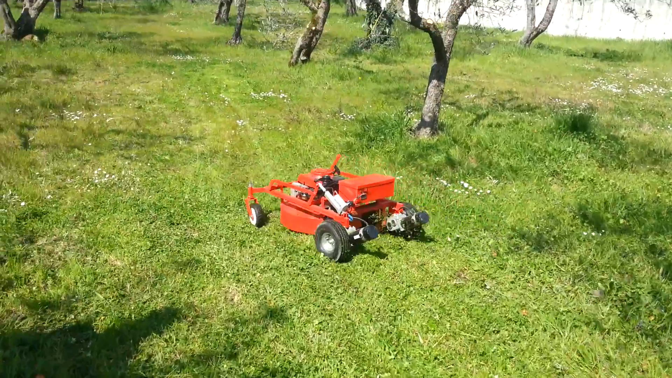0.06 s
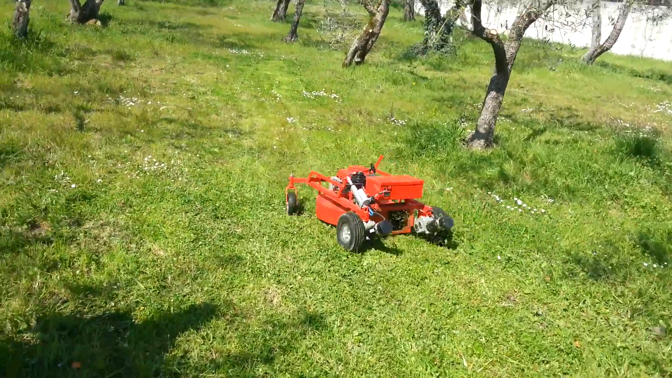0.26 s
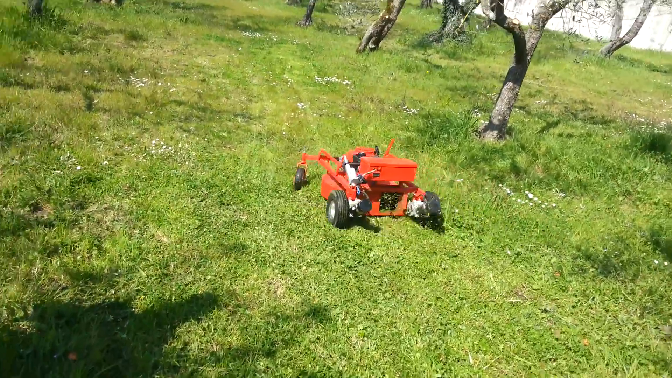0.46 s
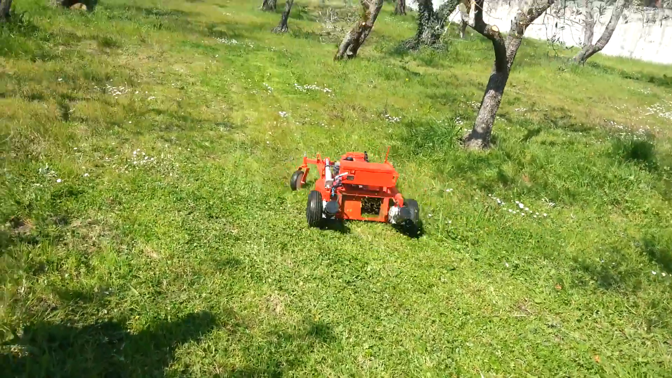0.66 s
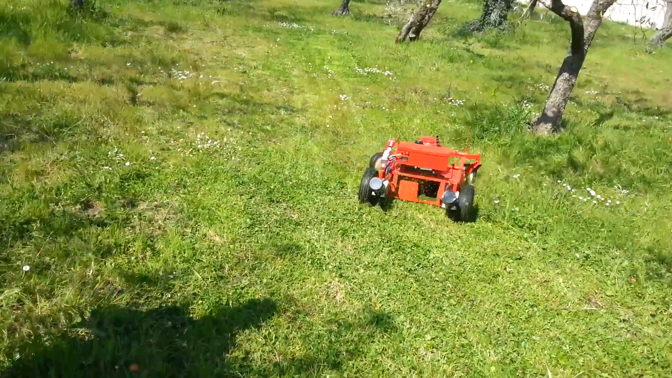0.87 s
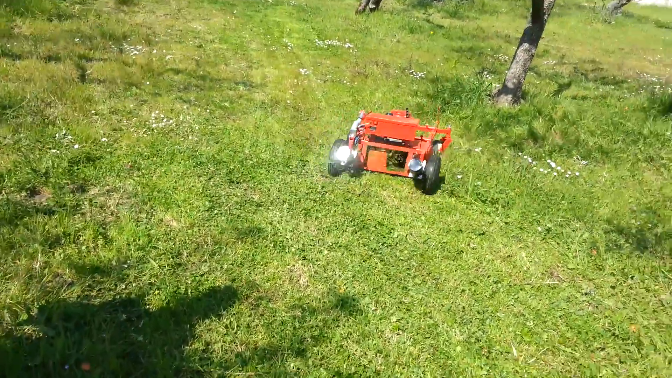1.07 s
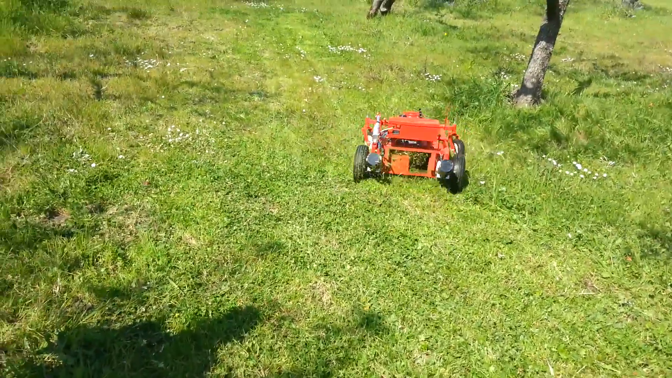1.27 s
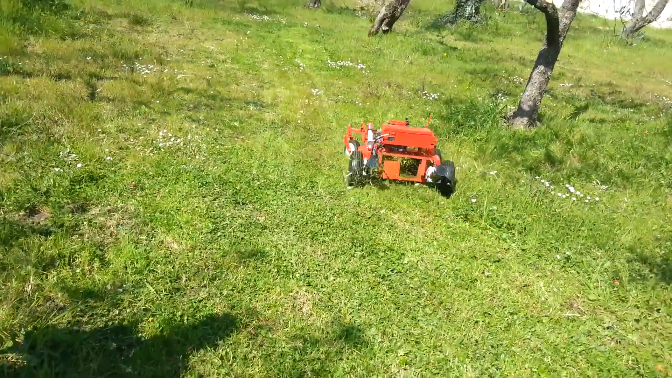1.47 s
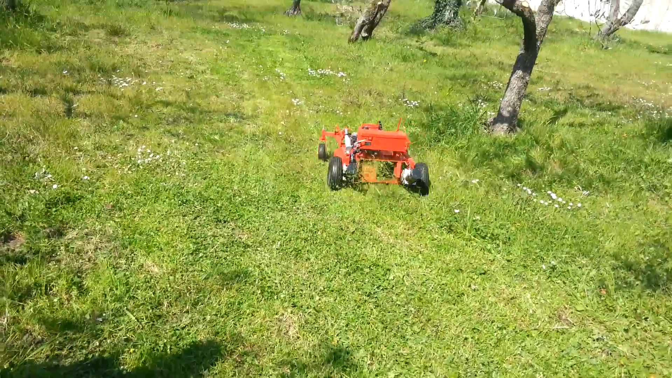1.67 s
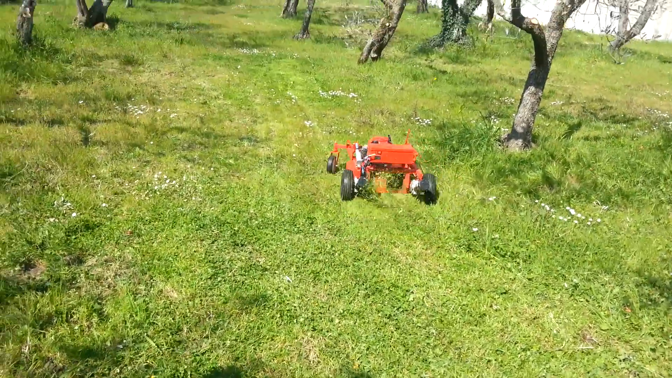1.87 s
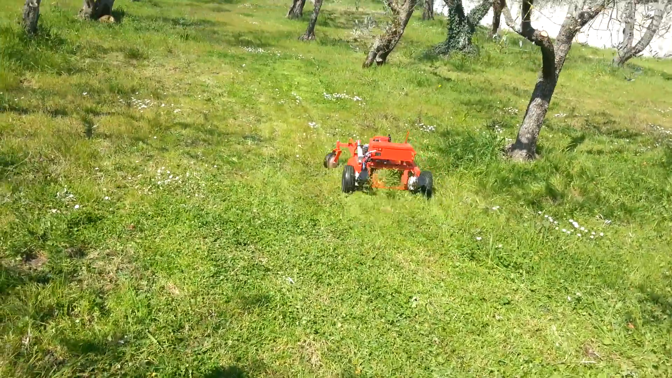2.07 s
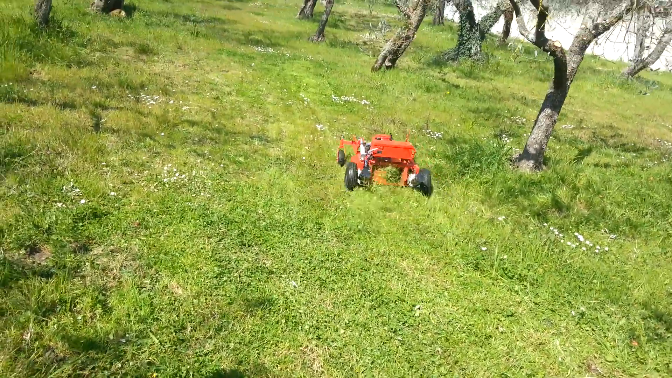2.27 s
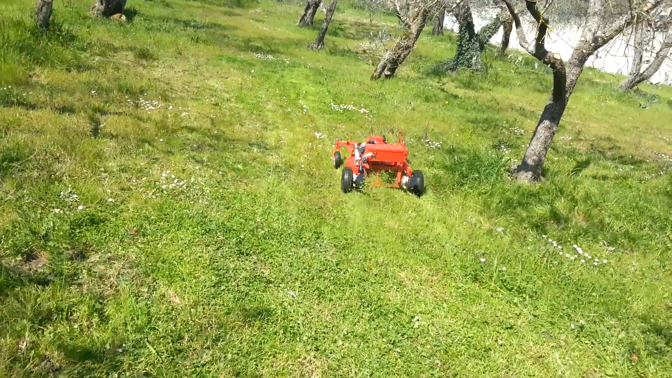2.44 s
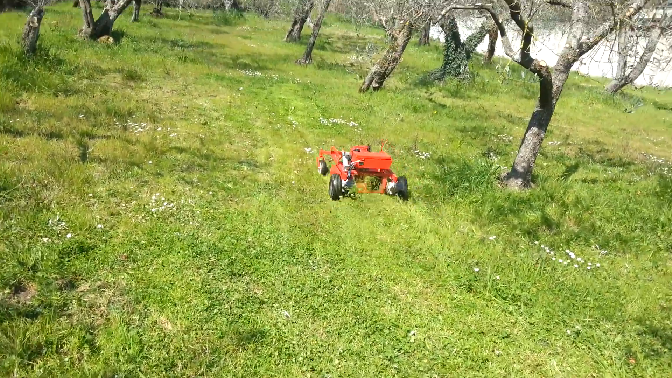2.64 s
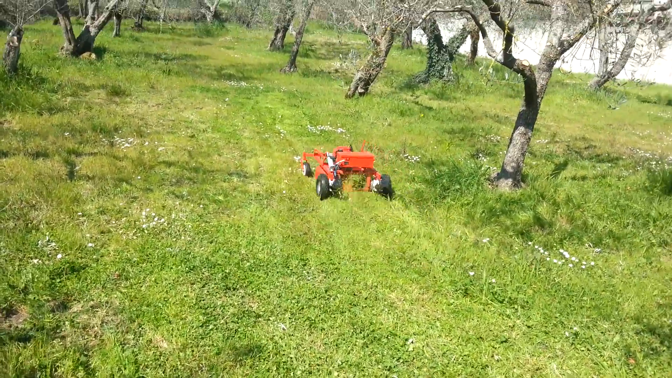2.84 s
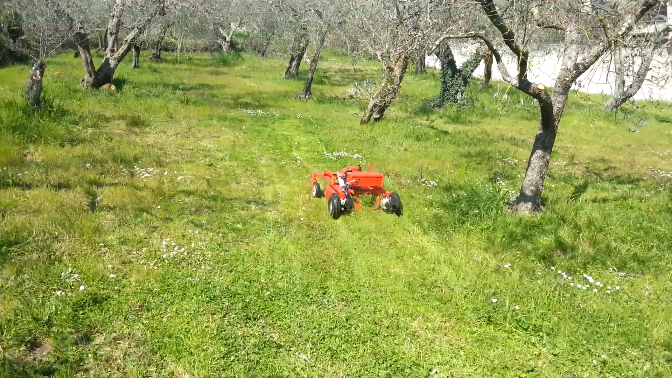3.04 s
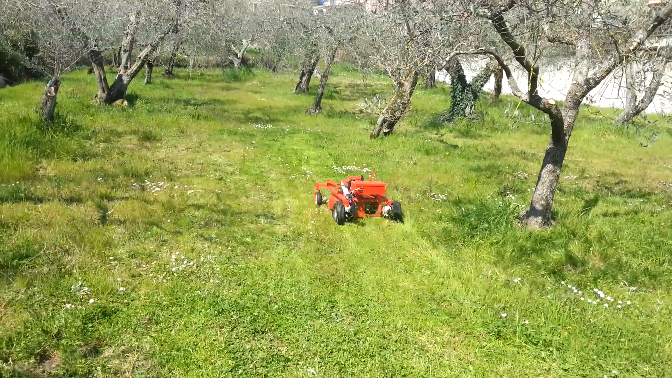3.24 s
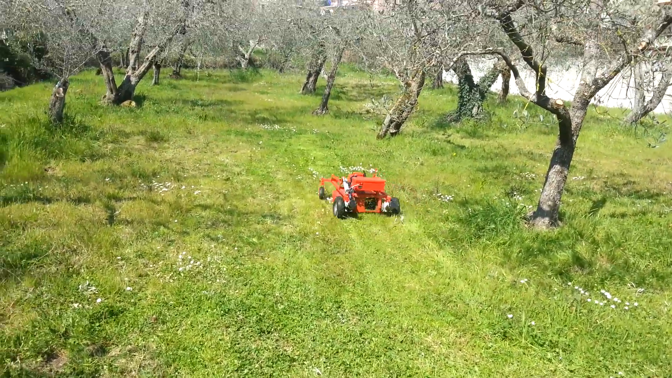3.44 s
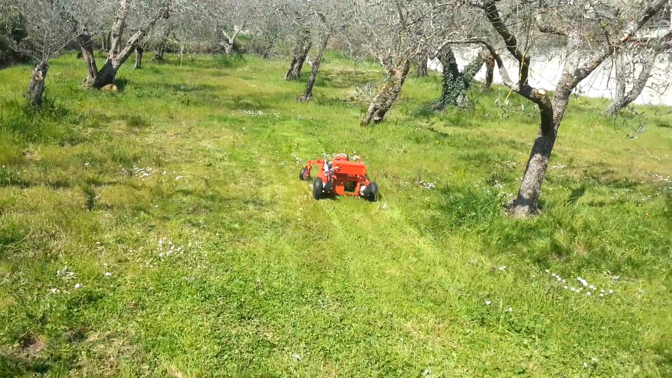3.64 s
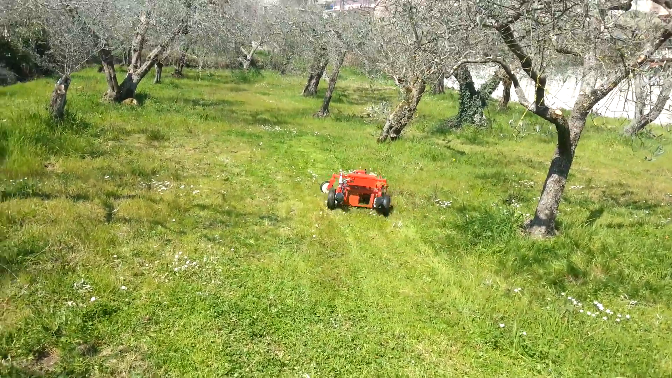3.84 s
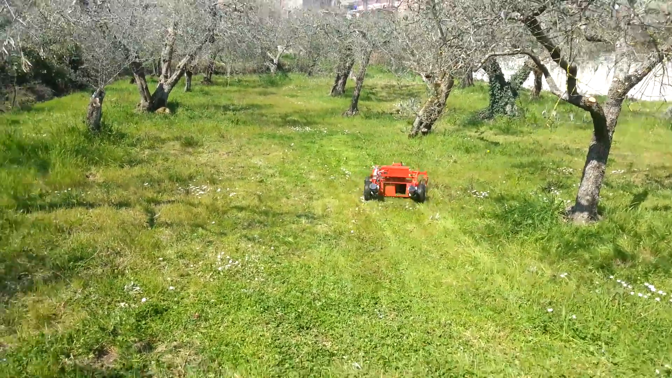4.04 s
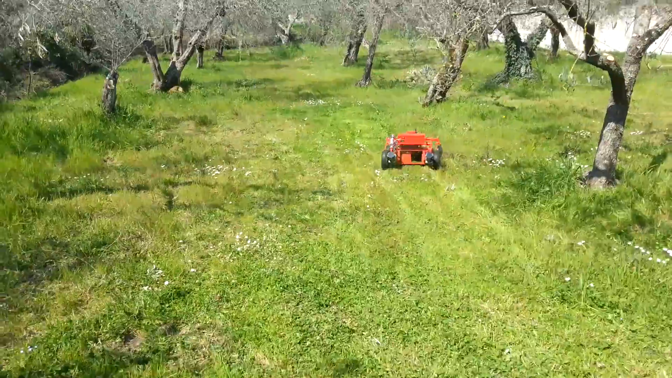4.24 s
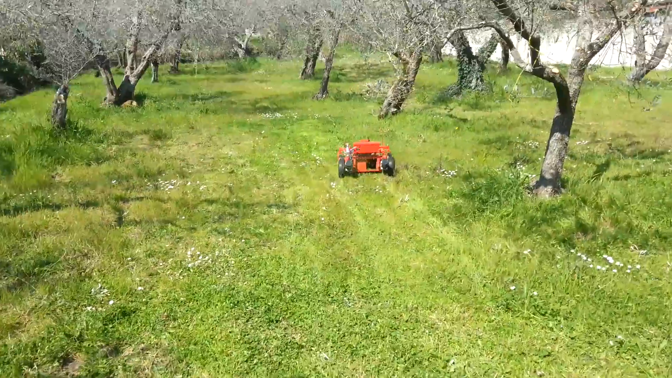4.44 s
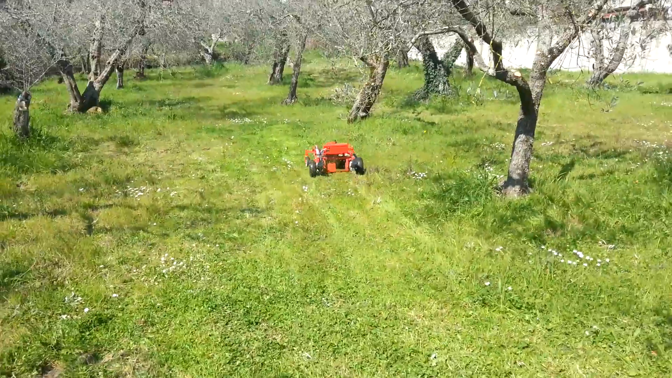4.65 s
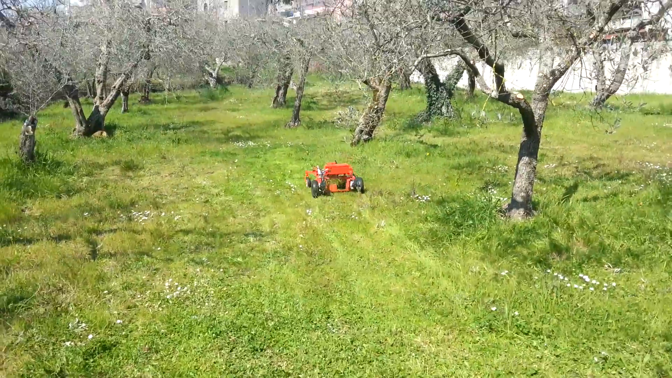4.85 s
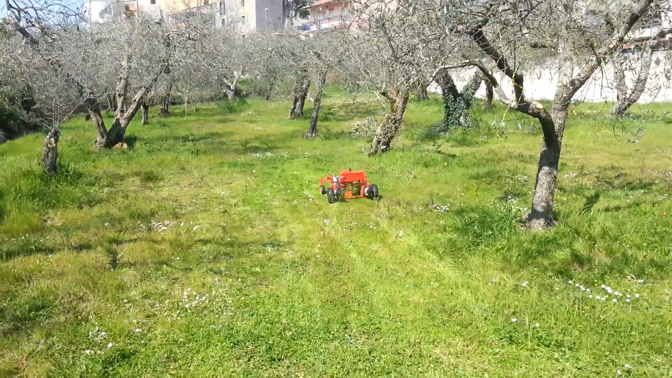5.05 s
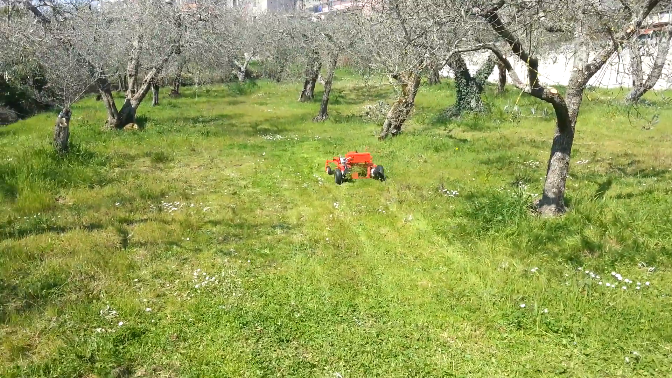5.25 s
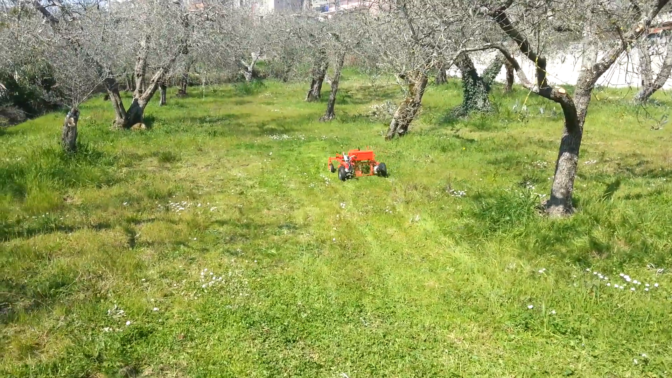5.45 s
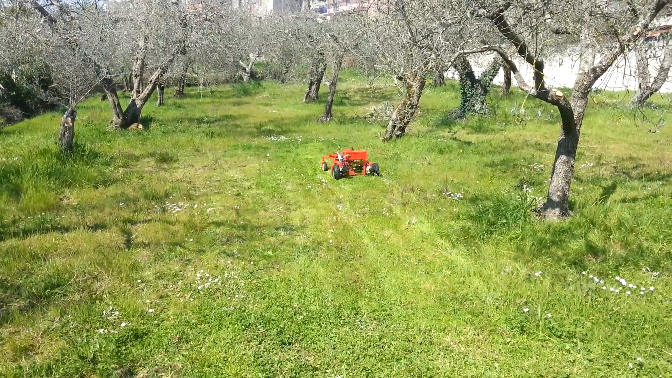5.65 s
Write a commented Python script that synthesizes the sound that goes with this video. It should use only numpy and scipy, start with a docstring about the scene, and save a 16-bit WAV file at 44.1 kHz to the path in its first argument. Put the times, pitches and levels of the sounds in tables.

```python
"""A single-cylinder four-stroke engine throbs in a remote-controlled mower that recedes through long grass,
then sounds somewhat nearer. Exhaust pulses ring the muffler; knocks clatter in block, deck and panels.
The blade buzzes as summed lines; noise and random snaps make shredded grass, flung stalks, passing bands.
Wheel motors whine at fixed pitch. Ground bounce and a short scattered tail surround the mower.
The right microphone port is shaded at first and opens up after about four seconds."""
import sys
import numpy as np
from scipy import signal
from scipy.fft import rfft, irfft, next_fast_len
from scipy.io import wavfile
from scipy.ndimage import uniform_filter1d

SR = 44100
rng = np.random.default_rng(int(sys.argv[2]) if len(sys.argv) > 2 else 0)


def to_wav(s):
    """Save 16-bit WAV."""
    ch = np.atleast_2d(s).T  # columns
    pcm = np.round(np.clip(ch, -1, 1) * 32767)  # PCM
    wavfile.write(sys.argv[1], SR, pcm.astype(np.int16))


N = 251799
TIME = np.arange(N) / SR

# Engine speed. Each row: time in seconds, crankshaft speed in turns per minute.
CRANK_SPEED = [(0.0, 2347), (0.4, 2340), (0.8, 2357), (1.2, 2363), (1.65, 2317), (2.0, 2313), (2.4, 2314),
               (2.95, 2308), (3.4, 2354), (4.0, 2361), (4.4, 2380), (4.8, 2367), (5.15, 2328), (5.71, 2332)]
# Blows within one two-turn cycle. Each row: place as share of the cycle, relative gas pulse in dB,
# relative clatter in dB.
CYCLE_BLOWS = [(.132, 1.5, -5), (.349, 4, -5.5), (0.47, -10.5, -9.5), (.705, 1, -6.5), (0.912, -8, -7)]
# Slow rises and falls in loudness of the deck and exhaust.
# Each row: time in seconds, deck gain in dB, exhaust gain in dB.
LOUDNESS_SWINGS = [(0, 1.5, 1), (.35, -1, -1.5), (.65, 1, 0), (.8, -6, -0.5), (1.02, 1, 1),
                   (1.27, -0.5, -3), (1.52, 1.5, 3.5), (1.75, -1, 0.5), (2.25, -1, 2), (2.7, 1, 0.5),
                   (2.8, -0.5, 0), (3.5, 0, -1.5), (4.28, -2.5, -1), (4.38, 1.5, -1.5), (4.85, -0.5, -2.5),
                   (5.12, 3.5, -1), (5.5, -3, -1.5), (5.71, -3, -2)]


def gain_of(db):
    """Decibels to amplitude."""
    return 10 ** (np.asarray(db) / 20)


def evened(x):
    """Scales to an rms of one."""
    return x / np.sqrt(np.mean(x ** 2) + 1e-20)


def curves(rows):
    """One value per sample for each column of a time table."""
    s, *columns = np.transpose(rows)
    return [np.interp(TIME, s, column) for column in columns]


def read(points, hz):
    """Interpolates a spectrum table on a log-frequency axis."""
    f, value = np.transpose(points)
    return np.interp(np.log(hz + 1), np.log(f + 1), value)


def filtered(x, response):
    """Applies a response given as a function of frequency in Hz."""
    size = next_fast_len(N + 8192)
    spectrum = rfft(x, size) * response(np.fft.rfftfreq(size, 1 / SR))
    return irfft(spectrum, size)[..., :N]


def coloured(x, points):
    """Filters x by a spectrum table and scales it to an rms of one."""
    return evened(filtered(x, lambda hz: gain_of(read(points, hz))))


def wander(rate_hz, channels=1):
    """Slow random motion of rms one, low-passed near rate_hz."""
    noise = rng.standard_normal((channels, N))
    return evened(filtered(noise, lambda hz: 1 / (1 + (hz / rate_hz) ** 4)))


def spread(pair):
    """Two unrelated signals become left and right, their likeness set band by band."""
    # Stereo likeness. Each row: frequency in Hz, left-right correlation.
    likeness = [(30, 0.21), (70, 0.7), (120, 0.83), (300, 0.92), (700, 0.99), (1300, 0.72), (2700, 0.8),
                (3600, 0.25), (5000, 0.15), (8000, 0.65), (14000, 0)]

    def same(hz):
        return np.clip(read(likeness, hz), -1, 1)

    mid = filtered(pair[0], lambda hz: np.sqrt((1 + same(hz)) / 2))
    side = filtered(pair[1], lambda hz: np.sqrt((1 - same(hz)) / 2))
    return np.array([mid + side, mid - side])


def distant(near_db, fall_db):
    """Level in dB of a mower part: near_db at 4 m, falling fall_db per doubling of distance."""
    # The mower recedes, then sounds somewhat nearer at the end.
    # Each row: time in seconds, distance in metres.
    distance = [(0, 3.75), (.6, 4), (.8, 4.6), (1.3, 5.75), (2.3, 7.7), (3.0, 8.53), (3.9, 9.8),
                (4.45, 10.4), (4.85, 13.3), (5.71, 9.8)]
    near_m = 4
    return near_db - fall_db * np.log2(curves(distance)[0] / near_m)


def orchard(x, wet_db=-12, t60_s=0.86, taps_per_s=2500, change_hz=2.515, count=3):
    """Trunks and a wall scatter a short, thin tail whose paths keep changing as the mower moves."""
    t = TIME[:SR // 4]
    shape = (count, 2, len(t))
    taps = rng.standard_normal(shape) * (rng.random(shape) < taps_per_s / SR)
    tails = taps * gain_of(-60 * t / t60_s) * (t > .004)
    tails /= np.linalg.norm(tails, axis=2, keepdims=True)
    wet = 0
    for k, tail in enumerate(tails):
        window = np.sqrt(2 / count) * np.cos(np.pi * (change_hz * TIME + k / count))
        wet = wet + signal.oaconvolve(x * window, tail, axes=1)[:, :N]
    return x + gain_of(wet_db) * wet


def ground(x):
    """Sums direct sound and lawn bounce; the comb notches slide as the paths change."""
    # Bounce off the ground. Each row: time in seconds, delay in ms, strength from 0 to 1.
    bounce_path = [(0, 1.18, 0.19), (.4, 1.19, 0.23), (.8, 1.14, .3), (1.0, 1.12, 0.36), (1.2, 1.23, 0.33),
                   (1.55, 1.17, 0.28), (1.9, 1.25, 0.29), (2.2, 1.24, 0.3), (2.68, 1.34, 0.28),
                   (2.88, 1.42, 0.36), (3.5, 1.46, 0.17), (4.05, 1.44, 0.22), (4.4, 1.26, .1),
                   (5.05, 1.22, 0.18), (5.71, 1.32, 0.22)]
    delay_ms, strength = curves(bounce_path)
    soft = filtered(x, lambda hz: 1 / (1 + (hz / 5500) ** 4))  # grass swallows the treble
    bounce = np.array([np.interp(TIME - delay_ms / 1000, TIME, channel) for channel in soft])
    return (x + strength * bounce) / np.sqrt(1 + strength ** 2)


def turning(x):
    """Crossfades from side to rear radiation, which differ in colour."""
    # Colour heard from the side. Each row: frequency in Hz, gain in dB.
    flank = [(200, 0), (275, 0.5), (312, 1.9), (360, -1.5), (420, -7.5), (560, 1.5), (780, -4.5),
             (1080, 1.5), (1300, 2), (1540, -5), (1760, 1), (2300, 0), (2850, -1.5), (3400, 0), (5500, -3),
             (9000, -2)]
    # The mower turns its back. Each row: time in seconds, share side-on.
    heading = [(0, 0.78), (.6, 0.84), (1.15, 0.9), (1.6, 0.29), (2.0, 0.036), (5.71, 0)]
    side_on = filtered(x, lambda hz: gain_of(read(flank, hz)))
    return x + np.clip(curves(heading)[0], 0, 1) * (side_on - x)


def mowing():
    """Extra cutting noise and engine load in dB: each tuft is bitten, held and cleared."""
    # The blade runs into thick tufts. Each row: start in seconds, length in seconds,
    # rise of cutting noise in dB, engine load in dB.
    thick_tufts = [(0.08, 0.05, 2.5, -2), (0.31, 0.051, 0.5, 3), (0.46, 0.27, 1, 1), (0.804, 0.018, 3.5, 1),
                   (0.874, 0.046, 6.5, 4), (0.947, .13, 4, 4), (1.23, 0.012, 10, -2.5),
                   (1.336, 0.068, 4, 1.5), (1.487, .04, 2.5, 6), (1.549, 0.037, 7, 3.5),
                   (1.626, 0.027, 3, 3.5), (1.72, 0.063, 2.5, 5), (1.822, 0.034, 6, 4.5),
                   (1.948, 0.074, 3, 1.5), (2.14, 0.1, 4, 3), (2.408, 0.084, 3, 4),
                   (2.607, 0.078, 4.5, 2.5), (2.68, 0.16, 2.5, -4), (3.775, 0.049, 1.5, -2),
                   (4.155, 0.058, 2.5, -2.5), (4.514, 0.02, 6.5, 1), (4.982, 0.034, 6, 2.5),
                   (5.016, 0.085, 4.5, 4), (5.084, 0.051, 5.5, 4.5), (5.15, 0.066, 2.5, 2.5),
                   (5.29, 0.12, 2, 2.5), (5.348, .025, 4, 1.5), (5.503, 0.022, 2.5, 1.5),
                   (5.678, .03, 6, 4.5)]
    bite_s, clear_s = 0.017, 0.031
    cut, load = np.zeros(N), np.zeros(N)
    for start, length, cut_db, load_db in thick_tufts:
        since = TIME - start
        shape = np.clip(since / bite_s, 0, 1) * np.exp(-np.clip(since - length, 0, 1) / clear_s)
        cut = np.maximum(cut, cut_db * shape)
        load = np.maximum(load, load_db * shape)
    return cut, load


def motors(load, rasp_db=5, rasp_hz=55, per_load=1.0):
    """The wheel motors whine at a fixed switching pitch; their gears fray each line into a rasp."""
    # Whine lines. Each row: multiple of motor_hz (rounded), relative level in dB.
    whine_lines = [(3, -4.5), (4, -1.5), (6, -11)]
    # Rise and fall of the whine. Each row: time in seconds, gain in dB before load.
    drive = [(0, -31), (1.5, -60), (1.9, -40), (2.4, -42), (2.7, -45), (2.82, -44), (4.2, -47), (5.1, -49),
             (5.71, -57)]
    motor_hz = 390.5
    whine = 0
    for order, db in whine_lines:
        a, b = gain_of(rasp_db) * wander(rasp_hz, channels=2)
        angle = 2 * np.pi * round(order) * motor_hz * TIME
        whine = whine + gain_of(db) * ((1 + a) * np.cos(angle) + b * np.sin(angle))
    return gain_of(curves(drive)[0] + per_load * load) * whine


def snaps(decay_s=0.0073, low_hz=5500):
    """Each dry stem snaps on the blade with a short bright tick of high-passed noise."""
    # Snapping stems. Each row: time in seconds, level in dB.
    stem_ticks = [(0.0423, -22), (0.0982, -30), (0.1346, -20), (0.157, -21), (0.167, -24), (0.5232, -25),
                  (0.9717, -19), (1.3977, -24), (1.5833, -20), (1.6606, -33), (2.6728, -35), (4.176, -28),
                  (4.191, -33), (4.387, -31), (4.6004, -39), (5.0175, -26), (5.0674, -22), (5.5238, -40),
                  (5.6226, -26), (5.6875, -27)]
    hits = np.zeros(N)
    for s, db in stem_ticks:
        hits[round(s * SR)] = gain_of(db)
    noise = rng.standard_normal((2, N))
    crack = evened(filtered(noise, lambda hz: hz ** 2 / (hz ** 2 + low_hz ** 2)))
    return crack * signal.lfilter([1], [1, -np.exp(-1 / (decay_s * SR))], hits)


def shred(cycles, snaps_per_s, snap_db, size_db, chop, tuft_db, tufts_per_s, tuft_s):
    """Both blade tips sweep through the grass each turn: a hiss with many small snapping stems."""
    rank = np.minimum(rng.exponential(1, (2, N)), 3.5)
    sizes = gain_of(size_db * rank) * (rng.random((2, N)) < snaps_per_s / SR)
    stems = evened(sizes * rng.choice([-1, 1], (2, N)))
    sweep = 1 + chop * np.cos(2 * np.pi * 2 * 2 * (cycles - .08))  # two tips, two turns a cycle
    bites = rng.uniform(0.34, 2.5, N) * (rng.random(N) < tufts_per_s / SR)
    tufts = signal.lfilter([1], [1, -np.exp(-1 / (tuft_s * SR))], bites)  # bitten at once, then clears
    hiss = rng.standard_normal((2, N)) + gain_of(snap_db) * stems
    return hiss * sweep * np.sqrt(1 + gain_of(tuft_db) ** 2 * tufts)


def crackle_bands(cycles, swell=.5):
    """Bands of crackling noise swell and fade, pulsing at the blade-tip rate."""
    # Passing crackling noise bands, from low deck booms to thin high grass hiss.
    # Each row: start in seconds, length in seconds, centre in Hz, width in Hz, level in dB.
    bands = [(0, 0.29, 1690, 160, -27.5), (0, 0.19, 1050, 220, -28), (0.523, 0.17, 590, 150, -28.5),
             (0.613, 0.29, 2010, 260, -31), (0.945, 0.096, 636, 240, -24), (1.231, 0.033, 2460, 450, -18),
             (1.327, 0.12, 3200, 1200, -28.5), (1.336, .09, 567, 110, -28.5),
             (1.548, 0.043, 2700, 350, -27), (1.7, 1.0, 1670, 150, -40), (1.79, 0.075, 340, 60, -30),
             (1.95, 0.79, 2280, 300, -34), (2.6, 0.15, 4200, 2200, -37), (4.302, 0.18, 2690, 1150, -32.5),
             (4.58, .5, 13600, 1800, -37), (5.07, 0.09, 1600, 1500, -34), (5.094, 0.066, 4540, 1200, -33),
             (5.342, 0.045, 4600, 1900, -28.5)]
    crackle = shred(cycles, snaps_per_s=1200, snap_db=-0.5, size_db=3.0, chop=0.34,
                    tuft_db=2.5, tufts_per_s=62, tuft_s=0.011)
    out = np.zeros((2, N))
    for start, length, centre, width, db in bands:
        def band(hz):
            return np.minimum(hz / centre, 1) / (1 + (2 * (hz - centre) / width) ** 2)

        arch = abs(np.sin(np.pi * np.clip((TIME - start) / length, 0, 1))) ** swell
        out += gain_of(db) * arch * evened(filtered(crackle, band))
    return out


def stalks(knock_db=-5, hardness=0.72, scatter_db=-19, scatter_s=0.0074):
    """A stalk hits the deck and its pieces scatter; ringing grows faster with strength than scatter."""
    # Stalks flung against the deck. Each row: time in seconds, relative strength in dB.
    flung = [(0.1343, 0), (0.8874, -20), (0.976, -10), (1.2526, -4), (1.283, -3.5), (1.358, -7),
             (1.5439, 0.5), (1.558, -6), (1.5702, -4), (1.584, -2), (1.7418, -6), (1.8415, -5.5),
             (2.145, -8), (2.4254, -4), (4.9917, -9), (5.032, -6.5), (5.092, -4), (5.12, -8), (5.36, -6)]
    # Hard knock on the deck. Each row: mode in Hz, relative level in dB, t60 in seconds.
    knock_modes = [(1760, -6, 0.018), (2500, -9, 0.018), (3370, -8, 0.015), (4400, -18, 0.013),
                   (5670, -12, 0.0065), (7840, -6, 0.0049)]
    # Scattered pieces. Each row: frequency in Hz, relative level in dB per Hz.
    scatter_colour = [(30, -50), (200, -22), (900, -39), (1700, -25), (2500, 25), (3400, -17), (4200, -7),
                      (8000, 12), (14500, 7)]
    t = TIME[:SR // 10]
    ring = 0
    for k, (hz, db, t60_s) in enumerate(knock_modes):
        ring = ring + (-1) ** k * gain_of(db - 60 * t / t60_s) * np.sin(2 * np.pi * hz * t)
    hits = np.zeros(N)
    for s, db in flung:
        hits[round(s * SR)] = gain_of(db)
    knocks = signal.oaconvolve(hits ** (1 + hardness), ring)[:N]
    envelope = signal.oaconvolve(hits, np.exp(-t / scatter_s))[:N]
    scatter = envelope * coloured(rng.standard_normal((2, N)), scatter_colour)
    return gain_of(knock_db) * knocks + gain_of(scatter_db) * spread(scatter)


def grass(cycles, cut, tear_db=2, fizz_db=-2.5, heavy_db=-33, fizz_growth=0.37):
    """A coarse tearing, and a fine fizz that grows faster with the cutting level."""
    # Sward between the tufts. Each row: time in seconds, thickness as dB of cutting noise.
    sward = [(0, 2), (.55, -1.5), (.78, -5), (1.15, 0.5), (2.0, 1), (2.9, 0), (3.3, -4), (3.85, -2.5),
             (4.0, -3.5), (4.4, -4), (4.75, 7), (5.25, 7), (5.71, 4)]
    # Torn grass. Each row: frequency in Hz, relative level in dB per Hz.
    tear_colour = [(300, -27), (1500, 0), (3200, -0.5), (3520, 2), (3700, 3), (4000, 2.5), (4400, -2.5),
                   (5200, -4), (6500, -6), (8000, -6.5), (14500, -27.5)]
    # Fine fizz. Each row: frequency in Hz, relative level in dB per Hz.
    fizz_colour = [(2500, -16), (5000, 4), (7500, 0), (9500, 4), (12000, 5), (14500, -1)]
    level = distant(near_db=-30, fall_db=6) + curves(sward)[0] + cut
    coarse = shred(cycles, snaps_per_s=1400, snap_db=-2.5, size_db=3.5, chop=0.2,
                   tuft_db=2.5, tufts_per_s=45, tuft_s=0.0097)
    fine = shred(cycles, snaps_per_s=700, snap_db=-2.5, size_db=5.0, chop=0.058,
                 tuft_db=-1.0, tufts_per_s=91, tuft_s=0.0079)
    tear = gain_of(tear_db) * coloured(coarse, tear_colour)
    fizz = gain_of(fizz_db + fizz_growth * (level - heavy_db)) * coloured(fine, fizz_colour)
    return gain_of(level) * (tear + fizz)


def blade(cycles, load, waver_db=2.0, per_load=0.68, count=38):
    """Two tips pass the chute every turn: a buzz whose lines waver in the churning air."""
    # Tip-passing buzz. Each row: frequency in Hz, relative level in dB per line.
    buzz_colour = [(160, -14), (310, -0.5), (390, -6), (470, 2.5), (545, -1.5), (625, -3), (700, 0),
                   (860, -5), (1020, -3.5), (1250, -3), (1650, -10.5), (1900, -6.5), (2300, -6.5),
                   (3000, -9)]
    passes = 2 * 2 * cycles  # two tips, two turns a cycle
    pass_hz = 2 * np.mean(curves(CRANK_SPEED)[0]) / 60
    wavers = gain_of(waver_db * wander(12.4, channels=5))
    buzz = 0
    for k in range(2, count):
        line = np.cos(2 * np.pi * (k * passes + rng.random()))
        buzz = buzz + gain_of(read(buzz_colour, k * pass_hz)) * wavers[k % len(wavers)] * line
    return gain_of(distant(near_db=-30.5, fall_db=6.5) + per_load * load) * evened(buzz)


def panels(cycles, load, low_hz=520, high_hz=2800, t60_s=0.071, uneven_db=3, per_load=0.53):
    """Every engine blow sets some loose panel ringing briefly, at a random pitch each time."""
    t, out = TIME[:SR // 12], np.zeros((2, N))
    for place, _, db in CYCLE_BLOWS:
        starts = np.flatnonzero(np.diff(np.floor(cycles - place)) > 0)
        for at, (pitch, size, *phases) in zip(starts, rng.random((len(starts), 4))):
            hz = low_hz + (high_hz - low_hz) * pitch
            decay = gain_of(db + uneven_db * (2 * size - 1) - 60 * t / t60_s)
            ring = decay * np.sin(2 * np.pi * (hz * t + np.c_[phases]))
            out[:, at:at + len(t)] += ring[:, :N - at]
    level = distant(near_db=-30, fall_db=6) + curves(LOUDNESS_SWINGS)[0] + per_load * load
    return gain_of(level) * evened(out)


def blows(cycles, levels_db, decay, uneven_db):
    """Amplitude of each cycle's blows: sharp rise, decay in cycles, random spread of uneven_db."""
    power = 0
    for (place, _, _), db in zip(CYCLE_BLOWS, levels_db):
        since = cycles - place + 1
        chance = rng.standard_normal(256)[since.astype(int)]
        pulse = gain_of(db + uneven_db * chance) * np.exp(-(since % 1) / decay)
        power = power + pulse ** 2
    return evened(np.sqrt(power))


def rattle(cycles, repeat, steady, decay, uneven_db, size=2048):
    """Valve and piston knocks, their fine pattern partly repeating each cycle, over a steady rush of air."""
    pattern = rng.standard_normal((2, size))[:, (cycles % 1 * size).astype(int)]
    share = np.clip(repeat, 0, 1)
    grain = np.sqrt(share) * pattern + np.sqrt(1 - share) * rng.standard_normal((2, N))
    knocks = grain * blows(cycles, np.transpose(CYCLE_BLOWS)[2], decay, uneven_db)
    return knocks + steady * rng.standard_normal((2, N))


def deck_response(hz):
    """The steel deck's resonances, summed in power; it radiates little below them."""
    # Deck resonances. Each row: centre in Hz, width parameter in Hz, relative peak in dB.
    resonances = [(1584, 107, 8), (2070, 1200, -8), (2290, 900, 6.5), (2590, 220, -10.5), (3300, 1200, -7),
                  (4550, 160, -1), (5620, 25, -16), (5680, 27, 1), (6120, 50, -11), (7240, 150, -12.5)]
    power = 0
    for f, width, db in resonances:
        power = power + gain_of(db) ** 2 / (1 + (2 * (hz - f) / width) ** 2) ** 1.51
    return np.sqrt(power)


def machine(cycles, cut, load, deck_per_load=0.18, deck_per_cut=0.47):
    """Knocks sound through engine block and deck, harder under load; cut grass drums the deck too."""
    # Engine block. Each row: frequency in Hz, relative level in dB per Hz.
    block_colour = [(100, -47), (300, 4), (440, 0.5), (600, 2.5), (720, 2.5), (850, -2.5), (1080, -1),
                    (1270, -6), (1450, -5.5), (1800, -8), (3000, -11.5), (8000, -33)]
    block_level = distant(near_db=-23.5, fall_db=6) + load
    deck_level = distant(near_db=-24.5, fall_db=6) + curves(LOUDNESS_SWINGS)[0]
    deck_level = deck_level + deck_per_load * load + deck_per_cut * cut
    block_knocks = rattle(cycles, repeat=0.49, steady=0.6, decay=0.17, uneven_db=0.0)
    deck_knocks = rattle(cycles, repeat=0.43, steady=1.0, decay=0.12, uneven_db=4.0)
    block = coloured(block_knocks, block_colour)
    deck = evened(filtered(deck_knocks, deck_response))
    return gain_of(block_level) * block + gain_of(deck_level) * deck


def exhaust(cycles, load, order=8, puff_db=-2.0, waver_db=0.5, stray=0.35, stray_hz=6, per_load=0.33):
    """Gas pulses ring the muffler as drifting lines, with turbulent puffs and one swelling drone line."""
    # Muffler lines. Each row: multiple of the firing rate, relative level in dB.
    muffler = [(4, -27), (5, -19), (6, -13.5), (7, -18.5), (8, -13.5), (9, -7), (10, -5), (11, -11),
               (13, -10.5), (14, -16), (15, -11.5), (16, -12), (17, -8.5), (18, -5), (19, -7.5), (20, -12),
               (21, -18.5)]
    # Drone that swells and sinks. Each row: time in seconds, peak amplitude in dB.
    drone_level = [(0, -27.5), (.16, -30), (.33, -24), (.48, -26.5), (.62, -22.5), (.73, -35), (.81, -32),
                   (.95, -24.5), (1.12, -23.5), (1.2, -31.5), (1.31, -30.5), (1.52, -21), (1.76, -34),
                   (1.87, -27.5), (2.2, -29), (2.45, -27), (2.77, -27), (2.88, -33.5), (3.0, -28.5),
                   (3.48, -33), (3.62, -26.5), (3.8, -33.5), (4.0, -31), (4.11, -40), (4.22, -29.5),
                   (4.38, -36), (4.55, -31), (4.74, -35.5), (5.02, -34), (5.36, -28.5), (5.61, -32),
                   (5.71, -48)]
    # Exhaust puffs. Each row: frequency in Hz, relative level in dB per Hz.
    puff_colour = [(20, -38), (60, -34), (110, -21), (180, -9), (270, 2.5), (340, -6.5), (420, -2.5),
                   (700, -19), (2000, -65)]
    drone_order, governor_s = 12, 0.063
    place, gas_db, _ = np.transpose(CYCLE_BLOWS)
    drift = stray * (wander(stray_hz, channels=5) + 1j * wander(stray_hz, channels=5))

    def line(k):
        # the pulses' spacing sets each line's phase
        lag = np.angle(np.sum(gain_of(gas_db) * np.exp(-2j * np.pi * k * place)))
        if k <= order:  # the lowest lines all swing with the main gust, a deep chug
            lag = -2 * np.pi * k * place[np.argmax(gas_db)]
        return np.exp(1j * (2 * np.pi * k * cycles + lag))

    stack = 0
    for multiple, db in muffler:
        k = round(multiple)
        stack = stack + gain_of(db) * (line(k) * (1 + drift[k % len(drift)])).real
    throb = evened(stack) * gain_of(waver_db * wander(21.0))
    gusts = blows(cycles, gas_db, decay=0.29, uneven_db=1)
    puffs = coloured(rng.standard_normal((2, N)) * gusts, puff_colour)
    throttle = uniform_filter1d(load, size=round(governor_s * SR))  # answers the load smoothly
    level = distant(near_db=-29, fall_db=4) + curves(LOUDNESS_SWINGS)[1] + per_load * throttle
    drone = gain_of(curves(drone_level)[0]) * line(drone_order).real
    return gain_of(level) * (throb + gain_of(puff_db) * spread(puffs)) + drone


def scene():
    """One firing every two crankshaft turns times engine and blade; tufts add load and cutting noise."""
    cycles = np.cumsum(curves(CRANK_SPEED)[0]) / (2 * 60 * SR)
    cycles = cycles + .0012 * wander(8)[0]
    cut, load = mowing()
    noises = machine(cycles, cut, load) + panels(cycles, load) + grass(cycles, cut)
    noises = noises + crackle_bands(cycles) + snaps()
    mower = exhaust(cycles, load) + blade(cycles, load) + motors(load)
    mower = mower + spread(orchard(noises)) + stalks()
    return ground(turning(mower))


def ports(x, balance, low_cut_hz=54):
    """Tilts and phase-shifts left against right by band; the microphone drops the deepest bass."""
    # Phase between ports. Each row: frequency in Hz, radians by which left leads right.
    lead = [(120, 0.19), (250, 0.044), (600, 0.36), (1460, 0.5), (2600, -0.66), (3300, -1.1), (3700, -2.04),
            (4500, -0.64), (8000, 1.78)]

    def response(hz):
        ratio = gain_of(read(balance, hz))
        turn = np.exp(.5j * read(lead, hz))
        low_cut = hz ** 2 / np.sqrt(hz ** 4 + low_cut_hz ** 4)
        return low_cut * 2 * np.array([ratio * turn, 1 / turn]) / (1 + ratio)

    return filtered(x, response)


def record(dry, split_hz=3700, edge_hz=14750):
    """The right port goes from shaded to open, the treble last; then the band limit."""
    # Right port shaded. Each row: frequency in Hz, left minus right in dB.
    shaded_balance = [(60, 0), (210, -0.5), (330, 0.5), (500, 2), (770, 0.5), (1170, 5), (1790, 11.5),
                      (2740, 7), (4190, 0.5), (6410, -0.5), (9810, -2), (15000, 5)]
    # Right port open. Each row: frequency in Hz, left minus right in dB.
    open_balance = [(60, 3), (210, -1.5), (330, 4.5), (500, -6), (770, 1.5), (1170, -4), (1790, -2),
                    (2740, -3.5), (4190, -7), (6410, -10), (9810, -4.5), (15000, -9)]
    # Colour gained as the port opens. Each row: frequency in Hz, gain in dB.
    open_colour = [(180, 1.5), (340, -1), (850, 3.5), (1350, 4.5), (1570, 0), (1900, 4), (2500, 1),
                   (3150, 2), (3680, -3), (4600, 5.5), (6000, -1.5), (7500, 0.5), (10300, -10.5),
                   (13000, -6)]
    # Opening. Each row: time in seconds, share open in the middle range, share open in the treble.
    opening = [(0, 0.095, 0.014), (4.28, 0.22, 0.075), (4.42, 0.99, 0.32), (4.58, 0.84, 0.52),
               (4.85, 1, 0.75), (5.1, 0.71, 0.95), (5.71, 0.72, 0.94)]
    middle_share, treble_share = np.clip(curves(opening), 0, 1)
    shaded = ports(dry, shaded_balance)
    opened = filtered(ports(dry, open_balance), lambda hz: gain_of(read(open_colour, hz)))
    change = opened - shaded
    middle = filtered(change, lambda hz: 1 / (1 + (hz / split_hz) ** 10))
    heard = shaded + middle_share * middle + treble_share * (change - middle)
    band_limit = signal.firwin(401, edge_hz, window=("kaiser", 9), fs=SR)
    return signal.oaconvolve(heard, band_limit[None], "same")


dry = scene()
out = record(dry)
to_wav(out)
```